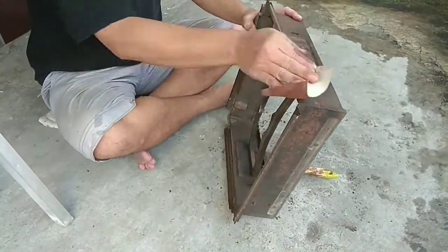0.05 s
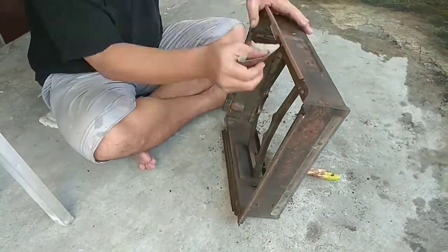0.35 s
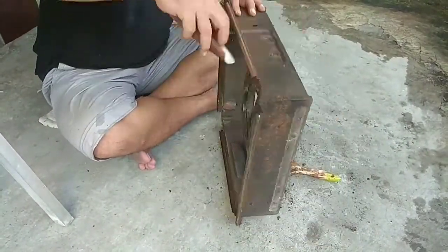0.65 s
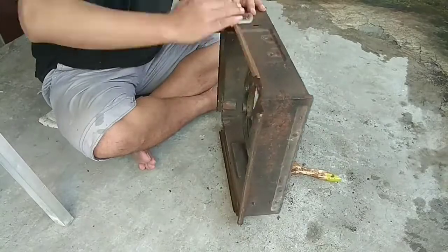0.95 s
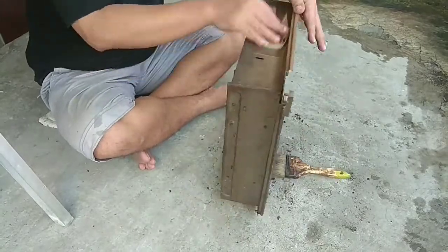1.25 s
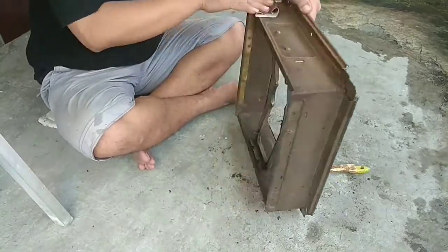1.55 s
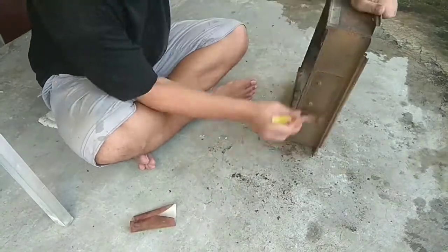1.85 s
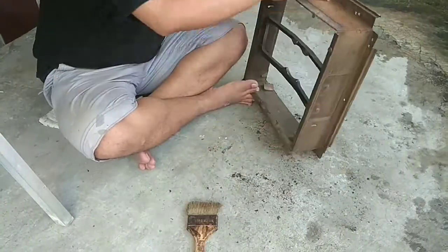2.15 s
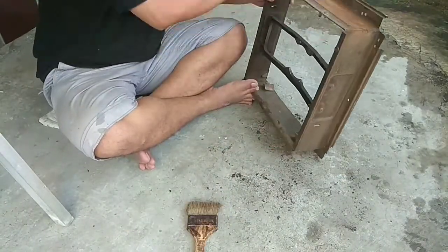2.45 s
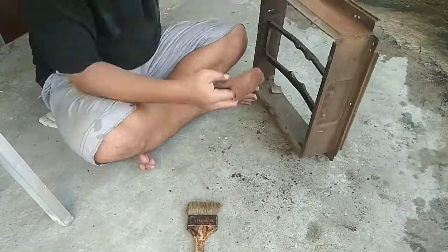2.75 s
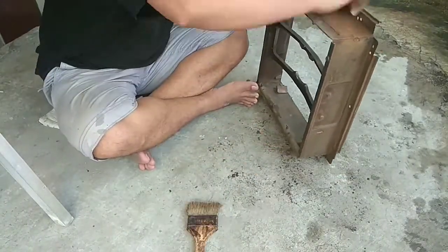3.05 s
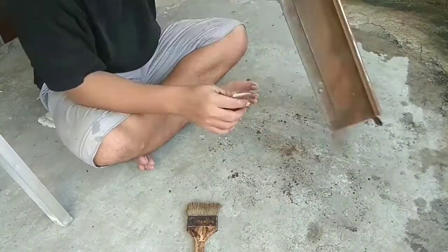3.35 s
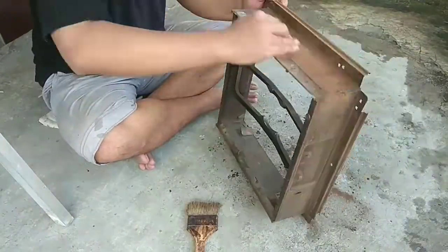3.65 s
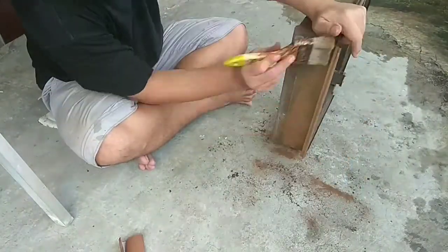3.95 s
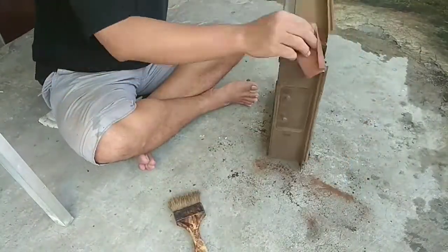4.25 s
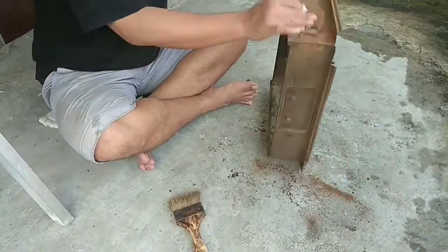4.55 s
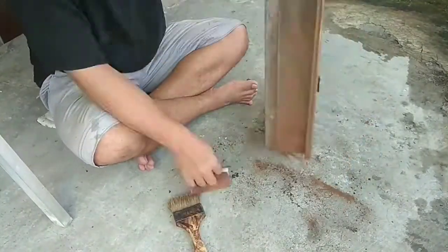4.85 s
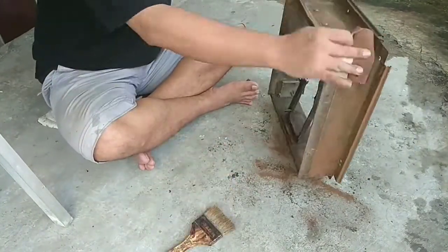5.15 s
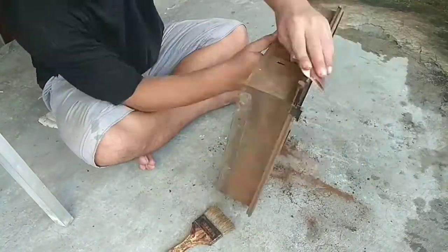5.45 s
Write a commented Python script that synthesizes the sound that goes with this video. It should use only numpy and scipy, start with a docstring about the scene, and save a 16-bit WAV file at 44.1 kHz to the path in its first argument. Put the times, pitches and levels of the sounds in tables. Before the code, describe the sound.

Sandpaper and a brush scrub rusty sheet steel in quick, uneven rasping strokes, with a few knocks as the frame shifts on concrete.

```python
"""A concrete yard, where sandpaper and a brush scrub a rusty sheet-steel frame in quick, uneven strokes.
Grit catches on the rust and rasps through the hand-damped steel, with a stick-slip squeak now and then.
As it is turned, the frame knocks, rubs and groans on the floor, and each shift sets off a low rumble.
Faint, still air lies underneath."""
import sys
import numpy as np
from scipy import signal
from scipy.fft import rfft, irfft
from scipy.io import wavfile
from scipy.ndimage import uniform_filter1d

SR = 44100
rng = np.random.default_rng(int(sys.argv[2]) if len(sys.argv) > 2 else 0)


def pcm_store(signal):
    """Save signal as 16-bit PCM."""
    levels = np.round(np.clip(np.atleast_2d(signal), -1, 1) * 32767)
    wavfile.write(sys.argv[1], SR, levels.astype(np.int16).T)


N = 251370
TIME = np.arange(N) / SR
FIRM_DB = -41  # a firm stroke: the reference for the sheet's low ring and the frame's rocking


def hand_strokes():
    """Envelopes of low ring, mid bite and hiss: the tool lands, judders as it swells or fades, lifts."""
    # One row a stroke; pressure lifts the low ring, bite lifts the mid rasp.
    # start_s, length_s, level_db, swell_db (start to end), judder_hz, judder_db, pressure_db, bite_db
    gestures = [(0.0, 0.056, -48, -18.5, 9, 1.0, 7, 4), (0.046, 0.06, -44.5, -1, 36.5, 2.0, 5.5, 2.5),
                (0.107, 0.068, -41.0, -1.5, 27, 2.0, 1, 1.5), (0.19, 0.103, -46.5, -1, 27.4, 4, 3, 3.5),
                (0.293, 0.074, -74.5, 22, 18, 3.0, 14.5, 0), (0.346, 0.12, -54, -1, 19.8, 7.5, 7.5, 4.5),
                (0.446, 0.074, -51.0, 3.5, 24.0, 2.5, 8.5, 4.0),
                (0.532, 0.038, -64.5, -2, 17.0, 7, 10, 4.5), (0.607, 0.056, -55.5, -20, 23.5, 11.5, 2, 3),
                (0.676, 0.045, -51, -8, 26.5, 8.5, 3, -0.5), (0.743, 0.099, -49.5, 2.5, 22.8, 8.5, 2, 0),
                (0.817, 0.069, -57, -1, 29, 5.5, 4.5, 3), (0.883, 0.097, -46, -1, 23.6, 5.5, 1.5, -1),
                (1.047, 0.025, -68, 8, 55, 4.5, 13, 7), (1.078, 0.14, -40.5, 6, 42, 1.5, -3, 1),
                (1.224, 0.12, -40.5, -3, 27.5, 2.5, -0.5, 3.5), (1.35, 0.086, -48, 13.5, 16, 5, 3.5, 4),
                (1.439, 0.052, -44, 5, 23, 8.0, 0, 5.5), (1.483, 0.062, -57, 5, 20.6, 4, -1, 4),
                (1.547, 0.08, -41, -8.5, 26, 1.5, -5, -0.5), (1.699, 0.051, -62, 12.5, 42, 2.5, 8.5, 3.5),
                (1.793, 0.095, -60.0, 5, 24.5, 2.5, -3.5, -2.5), (1.958, 0.094, -38.0, 1, 45, 3.0, -1, 2.5),
                (2.054, 0.097, -42.5, -2.5, 32, 4, -5.5, 0), (2.209, 0.098, -45.5, 3, 22, 7, -1, 0.0),
                (2.328, 0.054, -50.5, -11, 58.0, 1, 1, 1), (2.375, 0.13, -41.5, -4, 19.6, 1.5, -5, 1.5),
                (2.512, 0.14, -43, 2.5, 38, 1.5, -1.5, -1), (2.666, 0.04, -41.5, 1, 54.0, 0.5, -1.5, -0.5),
                (2.747, 0.05, -51, 4.5, 36.0, 5.0, 3, 2.5), (2.816, 0.064, -54, -14, 36, 9, -4, -2),
                (2.955, 0.099, -44, 6, 34, 2.5, 2, 1.5), (3.061, 0.058, -42, 10, 21, 5.5, 0.5, -7.5),
                (3.113, 0.102, -42.5, 8.5, 41.0, 2, -0.5, -1.5), (3.219, 0.07, -66, -6, 29, 12, -1, 3),
                (3.376, 0.077, -40, -2, 42.0, 3.5, 0.5, 3), (3.464, 0.1, -42, 2, 19.5, 2, 0.5, 1.0),
                (3.577, 0.092, -46.5, 12.5, 25, 4.0, 2, 2.5),
                (3.678, 0.064, -41, -13.5, 32.5, 4.5, -3, -2.5),
                (3.775, 0.14, -62, -10.5, 18.5, 5, 2.5, 4.5), (3.937, 0.034, -60, -5, 51, 2.5, -26, -2),
                (4.07, 0.092, -52.5, -20.5, 38, 2.5, 0.5, 5.5), (4.186, 0.1, -60, 25, 30.1, 6.5, 4.5, 4.5),
                (4.298, 0.094, -41.5, 15, 13.8, 4, -2, 4), (4.394, 0.088, -40.5, 0, 25.5, 2.5, -3, 3.5),
                (4.476, 0.053, -42.0, 9, 19, 0, 0.5, 1.5), (4.534, 0.097, -43.5, -5.5, 35, 3, -1.5, 5),
                (4.641, 0.1, -45, -4, 14.6, 1.5, -5, 2.0), (4.747, 0.043, -40.5, -8, 29, 1, -7.5, 0.5),
                (4.794, 0.057, -57, 3, 37.6, 6.0, 11, 6.5), (4.85, 0.11, -58.0, 18, 17.5, 6, 2, 0),
                (4.977, 0.099, -42.5, -8, 40, 3, -4, 0.0),
                (5.075, 0.044, -42.5, -19, 36.5, 4.5, -6.5, -1.5),
                (5.121, 0.045, -39.5, 2.5, 49.0, 2.5, -9, -1.0),
                (5.178, 0.075, -49.5, 3, 38, 3.5, 0.5, 2.0), (5.259, 0.061, -44.0, 3.5, 37, 2.5, 0.5, 1.5),
                (5.324, 0.074, -57.5, 9, 43.5, 1.0, 8.5, 3), (5.419, 0.066, -46.5, 10.5, 41, 0, 6.0, 0.5),
                (5.493, 0.064, -42, -7, 14.7, 3.5, 4, -6.5), (5.55, 0.082, -45.0, -2.5, 21, 6.5, 2, -5),
                (5.63, 0.067, -47.0, 10, 26, 0.5, 6.5, -0.5)]
    # The tool barely moving between strokes: ring_db, bite_db, hiss_db
    resting_db = [-74, -78, -79]
    attack_s, release_s = 0.016, 0.021
    ring_follows = 0.7  # the low ring falls more slowly than the hiss, so light strokes are duller
    power = np.outer(amp(resting_db), amp(4 * drift(every_s=.025))) ** 2
    for start, length, level_db, swell_db, judder_hz, judder_db, pressure_db, bite_db in gestures:
        near = slice(max(int((start - attack_s) * SR), 0), int((start + length + release_s) * SR))
        t = TIME[near] - start
        ramp = swell_db * (np.clip(t / length, 0, 1) - .5)
        hiss_db = level_db + ramp - judder_db * np.cos(2 * np.pi * judder_hz * t)
        ring_db = FIRM_DB + ring_follows * (hiss_db - FIRM_DB) + pressure_db
        contact = held(t, length, attack_s, release_s)
        power[:, near] += (contact * amp([ring_db, hiss_db + bite_db, hiss_db])) ** 2
    rust_catches = amp(.6 * drift(every_s=.007))
    return np.sqrt(power) * rust_catches


def sanding(ring, bite, hiss):
    """Grit rasps on rusty steel, in three bands that each ride their own envelope from the hand."""
    # Tone of grit on steel: frequency_hz, level_db
    rasp_colour = [(180, -90), (300, -35), (350, -19), (397, -58), (533, -27.5), (594, -30), (797, -17),
                   (1440, -12.5), (1580, -10.5), (3120, -7.5), (4820, -8.5), (5630, -6), (9260, 2),
                   (10300, -2), (12200, -27.5), (15900, -87), (22000, -120)]
    grains = wandering_modes(grit(per_s=12000, spread_db=2.5))
    flakes = grit(per_s=650, spread_db=2)  # dry ticks of rust coming off
    rasp = coloured(grains + 0.16 * flakes, rasp_colour)
    below = lambda hz: shaped(rasp, lambda f: 1 / (1 + (f / hz) ** 8))
    low, low_and_mid = below(hz=1980), below(hz=6520)
    mid, high = low_and_mid - low, rasp - low_and_mid
    return amp(1.3) * ring * low + amp(0.18) * bite * mid + amp(-0.33) * hiss * high


def grit(per_s, spread_db):
    """Tiny fractures of rust: random clicks, a few of them large."""
    size = amp(spread_db * np.minimum(rng.exponential(1, N), 4))
    return unit(size * rng.choice([-1, 1], N) * (rng.random(N) < per_s / SR))


def wandering_modes(x):
    """The moving contact favours ever different modes of the sheet: narrow rings within broad patches."""
    def blur(field, bins, frames):
        return unit(uniform_filter1d(uniform_filter1d(field, bins, axis=0), frames, axis=1))

    mode_depth_db, patch_depth_db = 3.3, 1.7
    spectrum = signal.stft(x, nperseg=1024, noverlap=768)[2]
    patch_noise, mode_noise = rng.standard_normal((2,) + spectrum.shape)
    patches = amp(patch_depth_db * blur(patch_noise, bins=12, frames=6))
    modes = amp(mode_depth_db * blur(mode_noise, bins=3, frames=10))
    modes /= np.sqrt(uniform_filter1d(modes ** 2, size=25, axis=0))  # neighbours share the same energy
    return unit(signal.istft(spectrum * modes * patches, nperseg=1024, noverlap=768)[1][:len(x)])


def knocks():
    """An edge lands and crushes grit: crunch, thud and short ring; hard blows ring only the high modes."""
    # The frame bumped and set down; a harder blow has a higher thud.
    # start_s, rise_s, decay_s, ring_db, thud_hz, thud_db, crunch_db
    hits = [(0.067, 0.0046, 0.012, -80, 300, -58, -68), (.460, 0.0043, .007, -66, 403, -66, -70),
            (0.506, .004, 0.013, -62, 313, -67, -68), (.599, 0.00032, 0.0032, -48.5, 1520, -58, -56),
            (1.227, 0.00435, 0.0084, -58, 325, -58, -70), (1.496, 0.0024, .008, -55, 314, -65, -70),
            (1.901, 0.0005, 0.0097, -30.5, 1510, -56, -34), (2.682, 0.005, 0.0097, -52, 400, -54.5, -48),
            (2.818, .0016, 0.014, -51.5, 247, -61.5, -42.5), (3.126, 0.006, 0.0058, -57, 238, -53, -70),
            (3.277, 0.0088, 0.014, -38.5, 342, -50, -36.5), (3.284, 0.0025, 0.015, -59, 630, -48, -62),
            (3.546, 0.002, .02, -56, 338, -48, -64), (3.614, 0.0033, .01, -64, 312, -48.5, -70),
            (3.727, 0.0052, 0.018, -52.5, 402, -52.5, -55),
            (3.8104, 0.00039, 0.0062, -37, 1660, -41.5, -36.5),
            (4.067, 0.00587, 0.019, -52, 313, -53.5, -52), (4.682, 0.0037, .025, -60.5, 276, -69, -62),
            (4.833, 0.0047, 0.0073, -65, 460, -61.5, -70), (5.445, 0.0052, 0.0096, -50, 444, -48.5, -62),
            (5.596, .003, 0.011, -54, 504, -53.5, -68)]
    # Tone of crushed grit: frequency_hz, level_db
    crunch_colour = [(300, -39), (900, -23), (3000, 5.0), (9500, 13.5), (11000, 1.5), (12400, -19)]
    out, t = np.zeros(N), np.arange(4096) / SR
    for start, rise, decay, ring_db, thud_hz, thud_db, crunch_db in hits:
        force = np.minimum(t / rise, 1) * np.exp(-(np.maximum(t - rise, 0) / decay) ** 1.9)
        grinding = rng.standard_normal(len(t))
        blow = 0.86 * force * grinding
        blow[int(rise * SR)] += 0.58 * np.linalg.norm(force)  # the moment the edge lands
        low_cut = signal.butter(2, 1.3 * thud_hz, "high", fs=SR, output="sos")
        ring = signal.sosfilt(low_cut, steel_ring(blow))
        thud = band_noise(thud_hz, width=0.47 * thud_hz, size=len(t))
        crunch = coloured(grinding, crunch_colour)
        add(out, start, amp(ring_db) * ring + force * (amp(thud_db) * thud + amp(crunch_db) * crunch))
    return out


def steel_ring(blow):
    """A blow rings the frame's damped modes; the wider a mode, the sooner it dies."""
    # Modes of the frame: pitch_hz, width_hz, relative_db
    modes = [(316, 150, -5.5), (517, 130, 1.5), (635, 53, 9), (793, 86, 2.5), (1095, 63, 4.5),
             (1197, 60, 0), (1455, 210, 4.5), (1940, 93, 6.5), (1907, 150, 6.5), (2420, 120, 0.5),
             (2850, 56, 3), (3080, 190, -6.5), (3720, 140, -18), (4000, 49, -1)]
    t = np.arange(2048) / SR
    ring = sum((-1) ** k * amp(db) * width * np.exp(-np.pi * width * t) * np.sin(2 * np.pi * hz * t)
               for k, (hz, width, db) in enumerate(modes))
    return signal.oaconvolve(blow, ring / np.linalg.norm(ring))[:len(blow)]


def squeaks():
    """Brief, fuzzy whistles of stick and slip, coloured by the sheet."""
    # One row a squeak: middle_s, length_s, pitch_hz, width_hz, level_db
    slips = [(.388, .016, 4500, 600, -53), (.629, .014, 4200, 380, -44.5), (.624, .02, 5600, 900, -53),
             (.972, .016, 4600, 600, -48), (.970, .014, 3250, 250, -50), (2.198, .012, 6080, 280, -49),
             (2.195, .014, 5250, 400, -57), (2.905, .013, 6050, 350, -51), (2.925, .014, 5900, 600, -42),
             (2.955, .02, 1500, 450, -57), (3.196, .018, 5450, 450, -45), (3.802, .016, 1080, 110, -52),
             (3.985, .04, 1550, 130, -70), (4.106, .016, 4400, 450, -44), (4.110, .018, 3200, 500, -51),
             (4.140, .018, 4350, 500, -55), (4.248, .022, 4750, 600, -56), (4.945, .016, 5020, 330, -48),
             (5.525, .017, 3000, 900, -43.5)]
    out, t = np.zeros(N), (np.arange(8192) - 4096) / SR
    for middle, length, hz, width, db in slips:
        whistle = wandering_modes(band_noise(hz, 2 * width, size=len(t)))
        whistle /= np.sqrt(abs(uniform_filter1d(whistle ** 2, size=300)) + 1e-9)  # friction steadies it
        add(out, middle + t[0], amp(db) * whistle * swell(t, length))
    return out


def frame_shifts():
    """Envelopes of rumble and rub: each shift of the frame starts, holds and stops."""
    # The frame moved over the floor: start_s, length_s, rumble_db, rub_db
    moves = [(0.06, 0.67, -85.5, -75.5), (1.384, 0.14, -76, -68.5), (1.616, 0.37, -72.5, -90),
             (2.67, .13, -75, -62.5), (3.066, 0.17, -75, -70.5), (3.239, 0.19, -61.5, -69),
             (3.496, .11, -60.5, -51), (3.61, 0.14, -61.5, -62), (3.713, 0.18, -62, -50.5),
             (3.884, 0.18, -69.5, -95), (4.065, 0.22, -63.5, -64.5), (4.278, 0.186, -80, -94),
             (5.267, 0.19, -71, -76), (5.403, 0.35, -66.5, -60)]
    power = np.zeros((2, N))
    for start, length, rumble_db, rub_db in moves:
        motion = held(TIME - start, length, attack_s=0.027, release_s=0.025)
        power += (amp([[rumble_db], [rub_db]]) * motion) ** 2
    return np.sqrt(power)


def floor_rub(shifted, pressed):
    """The frame rubs hollowly over the concrete as it is shifted, or rocked by firm strokes."""
    # Tone of the hollow rub: frequency_hz, level_db
    rub_colour = [(120, -26), (240, -2), (345, -0.5), (450, 1), (600, -9.5), (900, -21), (2000, -67)]
    rub = coloured(wandering_modes(grit(per_s=1500, spread_db=1.5)), rub_colour)
    bumps = amp(-77 + 6 * drift(every_s=.03))
    rocked = (pressed / amp(FIRM_DB)) ** 1.5 * bumps  # rocking grows faster than the pressure
    return amp(-7.5) * rub * np.hypot(shifted, rocked)


def groans():
    """The dragged frame judders: a rough low tone and its octave."""
    # One row a groan: middle_s, length_s, pitch_hz, level_db, octave_db (relative to the low tone)
    drags = [(1.64, 0.022, 157.6, -55.5, -30), (1.75, 0.13, 128.7, -64, -32), (1.86, .025, 127, -66, -30),
             (1.95, 0.016, 130, -59.5, -34), (3.485, 0.034, 181.5, -51, -6.5),
             (3.63, 0.032, 140.2, -51.5, -21), (3.785, 0.031, 184.8, -51, 1), (3.86, 0.024, 176, -46.5, -7),
             (5.51, 0.076, 191.6, -58, -12), (5.575, .035, 185.3, -63, -20)]
    out, t = np.zeros(N), (np.arange(16384) - 8192) / SR
    for middle, length, hz, db, octave_db in drags:
        jitter = unit(uniform_filter1d(rng.standard_normal(len(t)), size=200))
        phase = 2 * np.pi * np.cumsum(hz * (1 + 0.11 * jitter)) / SR
        tone = np.sin(phase) + amp(octave_db) * np.sin(2 * phase)
        add(out, middle + t[0], amp(db) * swell(t, length) * tone)
    return out


def low_rumble(shifted):
    """A rumble that swells while the frame is shifted and drifts faintly while it stands."""
    # Tone of the rumble: frequency_hz, level_db
    rumble_colour = [(30, -31), (60, -14), (90, -5.5), (135, -0.5), (185, 0.5), (235, -12.5), (300, -29),
                     (420, -27)]
    standing = amp(-89 + 9 * drift(every_s=0.22))
    return amp(1.0) * coloured(rng.standard_normal(N), rumble_colour) * np.hypot(shifted, standing)


def treble_spread(x):
    """Adds a very faint, short smear of treble, different in left and right."""
    gap_s, fade_s = .002, .04
    t = np.arange(4096) / SR
    tail = rng.standard_normal((2, len(t))) * amp(-60 * t / fade_s) * (t > gap_s)
    treble = np.diff(x, prepend=0)
    smear = signal.oaconvolve(treble[None], tail / np.linalg.norm(tail[0]), axes=1)[:, :N]
    return x + amp(-54.0) * smear


def still_air():
    """The yard's air: a faint, steady bed of noise."""
    # Tone of the air: frequency_hz, level_db
    air_colour = [(30, -59), (120, -0.5), (400, 11), (900, 0), (1700, 1.5), (3500, 6.5), (9000, -1.5),
                  (10500, -9), (12300, -32)]
    return amp(-82) * coloured(rng.standard_normal(N), air_colour)


def amp(db):
    """Decibels to gain."""
    return 10 ** (np.asarray(db) / 20)


def unit(x):
    """Scales to rms 1."""
    return x / np.sqrt(np.mean(x ** 2) + 1e-20)


def shaped(x, gain):
    """Filters x by a gain given as a function of frequency."""
    return irfft(rfft(x) * gain(np.fft.rfftfreq(len(x), 1 / SR)), len(x))


def coloured(x, colour):
    """Equalises x by a curve of (frequency_hz, level_db) points on a log-frequency axis, to rms 1."""
    hz, db = np.transpose(colour)
    return unit(shaped(x, lambda f: amp(np.interp(np.log(f + 1), np.log(hz + 1), db))))


def band_noise(hz, width, size):
    """Noise in one steep-sided resonance."""
    return unit(shaped(rng.standard_normal(size), lambda f: 1 / (1 + (2 * (f - hz) / width) ** 2) ** 1.44))


def drift(every_s):
    """A random curve at rms 1 that takes a new turn every every_s seconds."""
    knots = rng.standard_normal(4000)
    return unit(np.interp(TIME / every_s, np.arange(len(knots)), knots))


def swell(t, length):
    """A bell-shaped rise and fall; length is its width at half power."""
    return np.exp(-2 * np.log(2) * (t / length) ** 2)


def held(t, length, attack_s, release_s):
    """Smooth attack, hold and release."""
    rise = np.clip(t / attack_s + .5, 0, 1)
    fall = np.clip((length - t) / release_s + .5, 0, 1)
    return np.sin(np.pi / 2 * rise * fall) ** 2


def add(mix, start_s, sound):
    """Mixes a sound in at start_s."""
    part = mix[max(round(start_s * SR), 0):][:len(sound)]
    part += sound[:len(part)]


def scene():
    """The work on the frame sits dead centre, over rumble and air."""
    ring, bite, hiss = hand_strokes()
    rumble, rub = frame_shifts()
    work = sanding(ring, bite, hiss) + knocks() + squeaks() + floor_rub(rub, pressed=ring) + groans()
    return treble_spread(work) + low_rumble(rumble) + still_air()


def record(dry):
    """A steep low-pass takes off the top treble."""
    cutoff_hz = 12400
    low_pass = signal.firwin(511, cutoff_hz, window=("kaiser", 9), fs=SR)
    return signal.oaconvolve(dry, low_pass[None], "same")


dry = scene()
out = record(dry)
pcm_store(out)
```